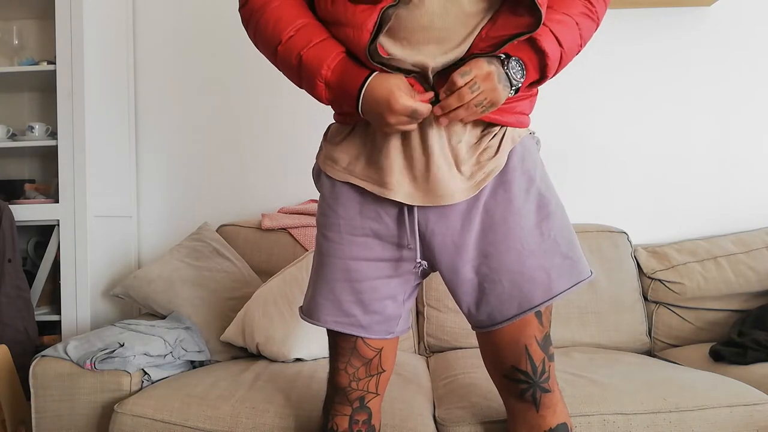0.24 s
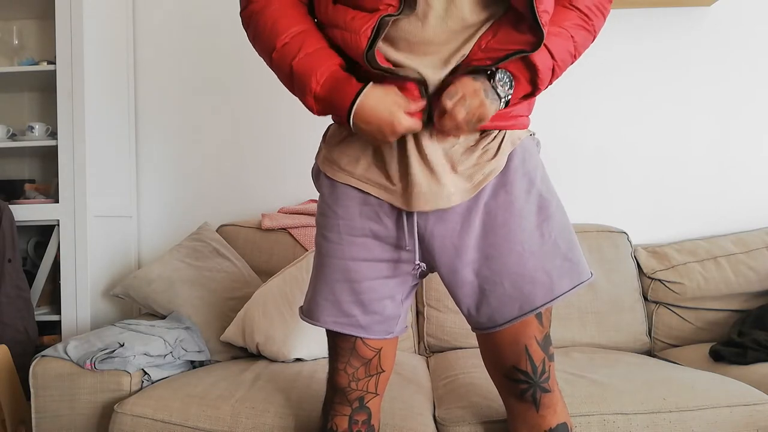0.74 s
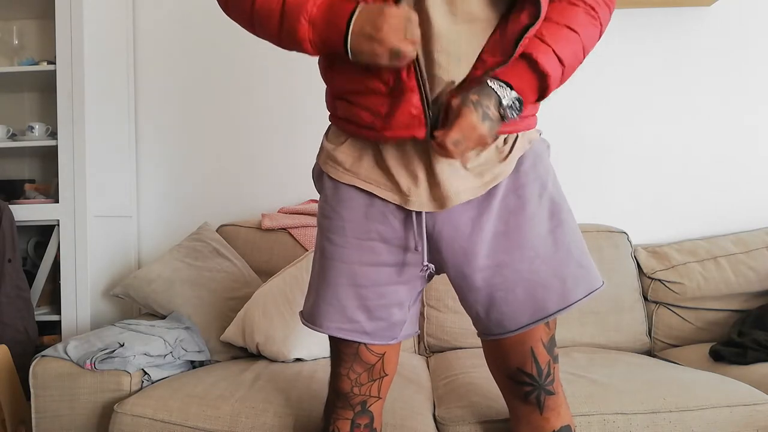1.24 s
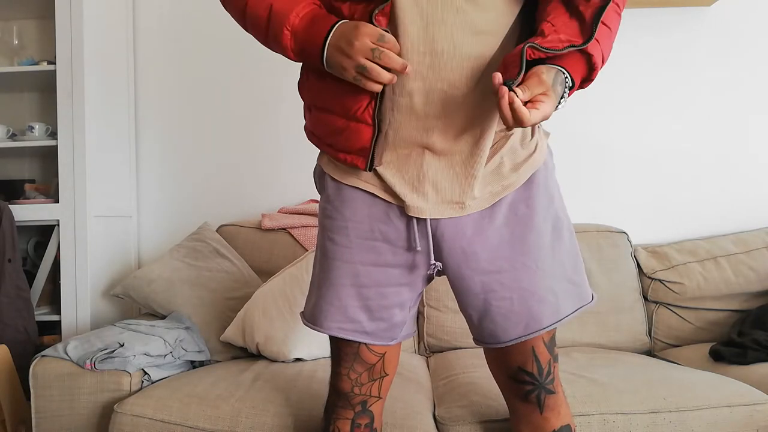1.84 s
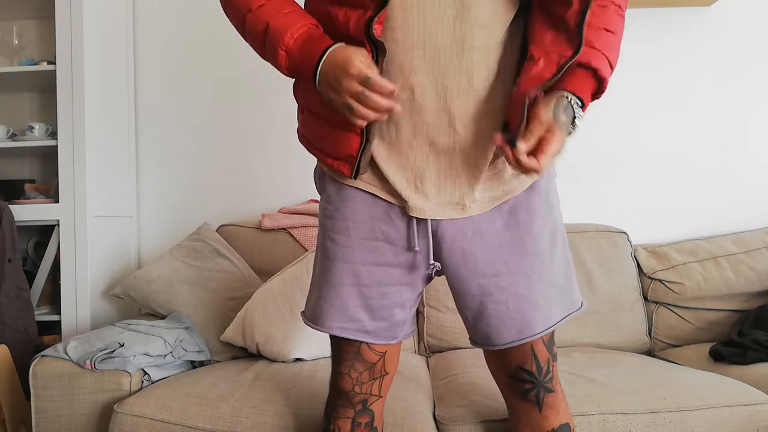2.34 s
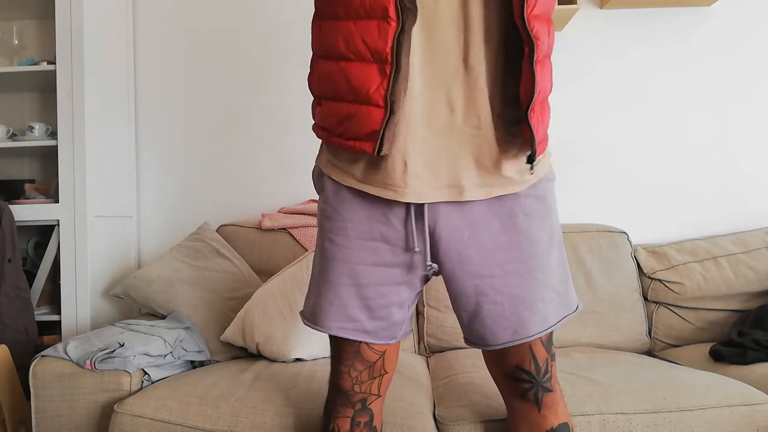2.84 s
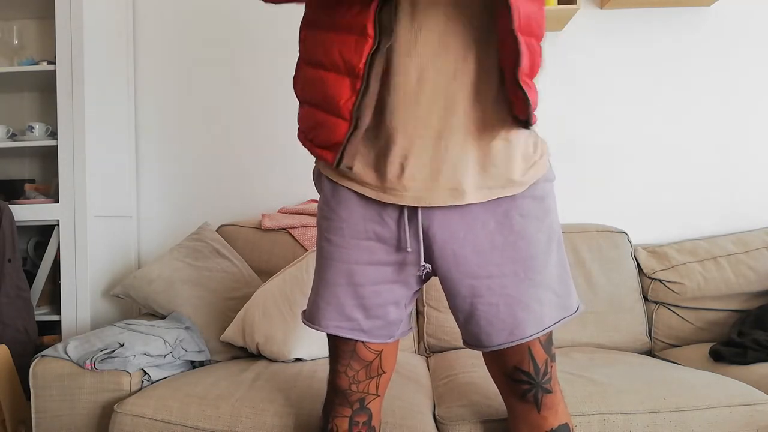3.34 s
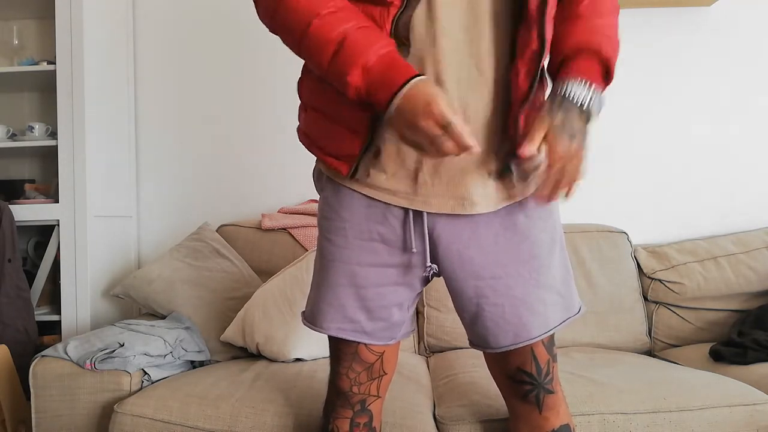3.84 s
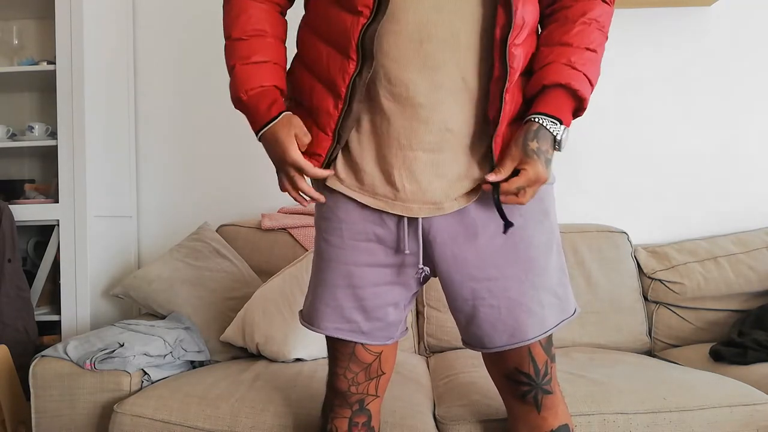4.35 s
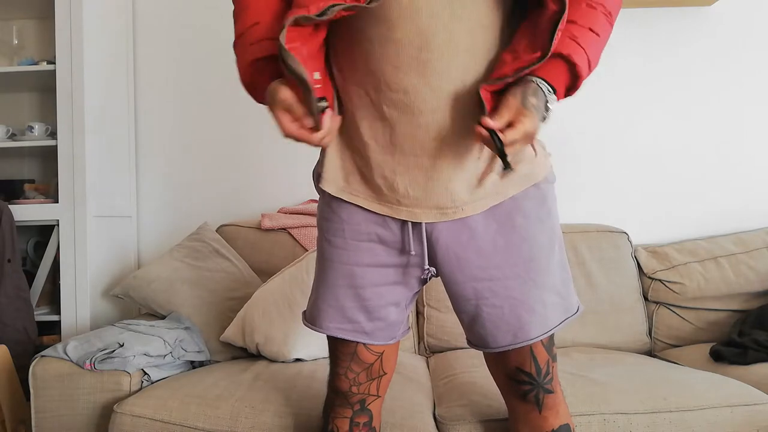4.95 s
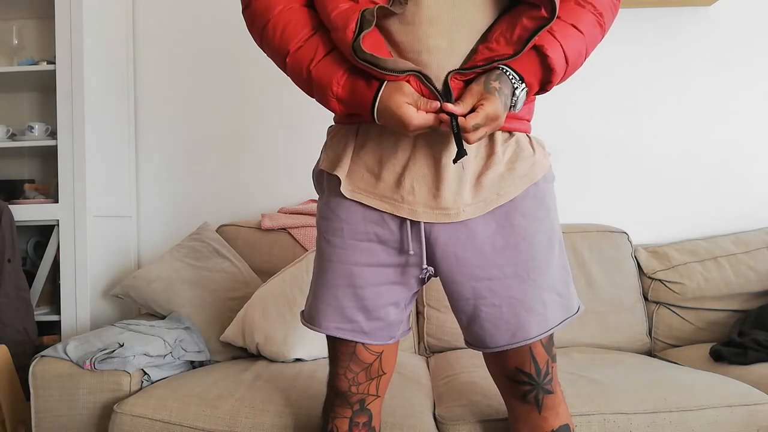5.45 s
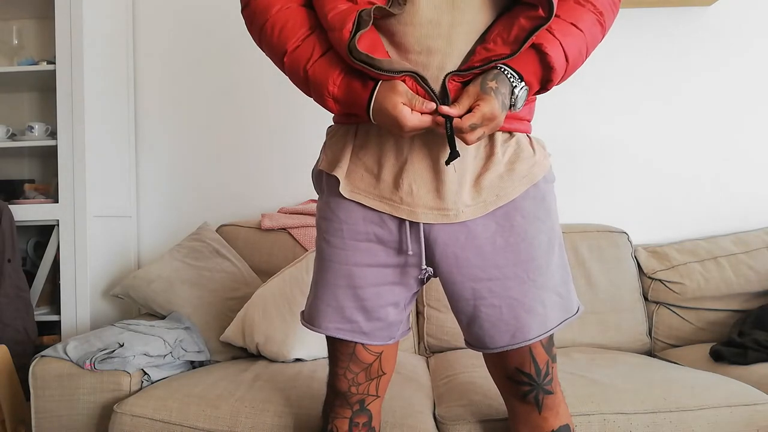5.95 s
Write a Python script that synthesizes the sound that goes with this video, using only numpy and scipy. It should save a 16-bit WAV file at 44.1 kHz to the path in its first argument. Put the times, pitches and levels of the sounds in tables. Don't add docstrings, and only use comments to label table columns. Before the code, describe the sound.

Close dry rustle of a padded jacket indoors, a short harsh rip and snap of zipper teeth, later a fast buzzing zip, then small ticks.

```python
import sys
import numpy as np
from scipy import signal
from scipy.fft import rfft, irfft, next_fast_len
from scipy.io import wavfile

SR = 44100
rng = np.random.default_rng(int(sys.argv[2]) if len(sys.argv) > 2 else 0)


def volts_from_decibels(level):
    exponent = np.asarray(level, float) / 20
    return 10 ** exponent


def wav_record(signal):
    frames = np.transpose(np.atleast_2d(signal))
    bounded = np.clip(frames, -1, 1)
    quanta = np.round(bounded * 32767).astype(np.int16)
    wavfile.write(sys.argv[1], SR, quanta)


N = 273403
CUTOFF_HZ = 15800

# (time [s], level [dB])
FIDGET_LEVEL = [(0, -63), (.7, -66), (.81, -61), (1.3, -58), (1.53, -64), (1.84, -70.5), (1.98, -78),
                (2.4, -73), (2.8, -60), (3.08, -59), (3.72, -66), (4.16, -66), (4.4, -70), (4.8, -68),
                (5.12, -59.5), (5.36, -61), (5.55, -75), (6.2, -80)]


def rms_one(x):
    return x / np.sqrt(np.mean(x ** 2) + 1e-20)


def in_time(rows):
    s, *columns = np.transpose(rows)
    return [np.interp(np.arange(N) / SR, s, c) for c in columns]


def at_hz(points, hz):
    point_hz, value = np.array(points).T
    return np.interp(np.log(hz), np.log(point_hz), value)


def drift(rate_hz):
    r = np.exp(-16 * np.pi * rate_hz / SR)
    noise = rng.standard_normal(N // 8 + 4002)
    slow = rms_one(signal.lfilter([1], [1, -2 * r, r * r], noise)[4000:])
    return np.interp(np.arange(N) / 8, np.arange(len(slow)), slow)


def butter(x, order, hz, kind):
    return signal.sosfilt(signal.butter(order, hz, kind, fs=SR, output="sos"), x)


def resonances(x, peaks):
    out = 0
    for k, (hz, width_hz, db) in enumerate(peaks):
        r = np.exp(-np.pi * width_hz / SR)
        b = (1 - r * r) / 2 * np.array([1, 0, -1])
        a = [1, -2 * r * np.cos(2 * np.pi * hz / SR), r * r]
        out = out + (-1) ** k * volts_from_decibels(db) * signal.lfilter(b, a, x)
    return out


def together(*levels_db):
    return np.sqrt(sum(volts_from_decibels(2 * db) for db in levels_db))


def swells(rows):
    curve = 1.35
    s, power = np.arange(0, N, 32) / SR, 1e-14
    for peak_s, db, rise_s, fall_s in rows:
        away = np.where(s < peak_s, (peak_s - s) / rise_s, (s - peak_s) / fall_s)
        power = power + volts_from_decibels(2 * (db - 10 * away ** curve))
    return np.interp(np.arange(N) / SR, s, 10 * np.log10(power))


def bands(spectrum, sources, patchy_db, low_hz, octaves):
    # (frequency [Hz], likeness [-1..1])
    likeness = [(60, 0.98), (150, 0.93), (300, 0.41), (560, -0.46), (1100, .6), (2000, 0.41), (4000, 0.2),
                (10000, .03)]
    edges = low_hz * 2 ** np.arange(0, np.log2(CUTOFF_HZ / low_hz) + octaves, octaves)
    for k, (low, high) in enumerate(zip(edges, edges[1:])):
        mid, side = butter(sources[k % 2], 2, [low, high], "band")
        hz = np.sqrt(low * high)
        alike = np.clip(at_hz(likeness, hz), -1, 1)
        gain = volts_from_decibels(at_hz(spectrum, hz) + patchy_db * drift(23.0))
        yield hz, gain * (np.sqrt(1 + alike) * mid + np.sqrt(1 - alike) * side * [[1], [-1]])


def room_tone():
    # (frequency [Hz], density [dB per Hz])
    background = [(8.8, -30), (15, 0), (31, -7), (55, -5), (119, -10), (145, -11), (184, -11.5),
                  (284, -20.5), (440, -21.5), (480, -23), (642, -18), (743, -21.5), (1680, -19),
                  (1830, -21.5), (6410, -25), (15800, -33.5)]
    noise = rng.standard_normal((2, 2, N))
    tone = sum(sound for hz, sound in bands(background, noise, 1.3, low_hz=15, octaves=1 / 2))
    return volts_from_decibels(-64.5) * rms_one(tone)


def folds(shell):
    # (peak time [s], filling level [dB], fall [s per 10 dB], shell vs filling [dB])
    creases = [(.01, -71, .12, 6), (.19, -67, .08, -2), (.34, -70, .08, 6), (.87, -64.5, .2, 9),
               (1.005, -65, .04, 15), (1.09, -67, .06, 6), (1.225, -60.5, .04, 7), (1.32, -80, .08, 23),
               (1.385, -52.5, .06, 9), (1.59, -68, .06, -2), (1.67, -68, .14, 3), (1.91, -71.5, .12, -5),
               (2.62, -74, .16, 16), (3.215, -55.5, .08, 8), (3.36, -63, .2, 8), (3.5, -54, .05, 2),
               (3.66, -72, .2, 3), (3.94, -72, .05, 4), (4.18, -64, .06, -1), (4.47, -76, .04, 10),
               (4.7, -72, .3, -2), (4.935, -73, .06, 15), (5.01, -62, .08, 0), (5.13, -65, .09, 0),
               (5.42, -59, .06, -8), (5.82, -74, .05, -6), (6.18, -71, .1, 1)]
    rise_s, snatched_rise_s = .035, .035 * .4
    rows = []
    for peak_s, db, fall_s, stiff_db in creases:
        rise = snatched_rise_s if db > -60 else rise_s
        rows.append((peak_s, db + shell * stiff_db, rise, fall_s))
    return swells(rows)


def rustle():
    # (frequency [Hz], density [dB per Hz])
    nylon = [(430, -9.5), (620, -13), (800, -9.5), (1000, -4.5), (1600, -7.5), (2300, -10), (4500, -10.5),
             (5800, -14), (7600, -6), (9700, -0.5), (11000, 2), (13000, -12.5), (15800, -16)]
    # (peak time [s], level [dB], rise [s per 10 dB], fall [s per 10 dB])
    panel_slides = [(.05, -62, .1, .07), (.32, -63, .08, .1), (.872, -47, .055, .15),
                    (1.008, -44.5, .08, .045), (1.115, -45.5, .05, .12), (1.157, -46.5, .08, .03),
                    (1.24, -51, .045, .15), (1.382, -43, .004, .11), (1.45, -47.5, .05, .04),
                    (1.664, -54, .1, .14), (2.58, -46, .09, .14), (3.495, -35.5, .08, .07),
                    (4.204, -56, .045, .09), (4.89, -48, .06, .12)]
    # (peak time [s], level [dB], rise [s per 10 dB], fall [s per 10 dB])
    sleeve_slides = [(.18, -66, .04, .06), (.575, -57, .13, .08), (2.25, -70, .25, .2),
                     (2.49, -50, .045, .1), (3.04, -65, .2, .15), (3.225, -40, .035, .12),
                     (3.32, -43, .08, .1), (3.405, -29.5, .05, .1), (3.68, -61, .06, .08),
                     (3.811, -59, .03, .08), (3.94, -56, .04, .12), (4.07, -56, .12, .08),
                     (4.468, -55.5, .05, .035), (4.58, -66, .08, .08), (4.705, -64, .15, .06),
                     (4.961, -47, .05, .06), (5.43, -63, .04, .08)]
    panel_db, sleeve_db = swells(panel_slides), swells(sleeve_slides)
    shell_db, (fidget_db,) = folds(shell=True), in_time(FIDGET_LEVEL)

    catches = volts_from_decibels(1.1 * drift(500.0) + 1.0 * drift(56.0))
    noise = catches * rng.standard_normal((2, 2, N))
    parts = np.zeros((3, 2, N))
    for hz, sound in bands(nylon, noise, 0.96, low_hz=424, octaves=1 / 4):
        parts[np.searchsorted([2400, 7000], hz)] += sound
    body, middle, hiss = map(rms_one, parts)

    panel_swing_db, sleeve_swing_db = panel_db + 45, sleeve_db + 45
    hiss_gain = together(panel_db, sleeve_db, fidget_db - 3)
    middle_gain = together(-52.5 + .75 * panel_swing_db, -57.5 + .75 * sleeve_swing_db,
                           fidget_db - 2, shell_db - 5)
    slide_body_db = -61 + .4 * np.maximum(panel_swing_db, sleeve_swing_db)
    body_gain = together(slide_body_db, fidget_db - 2.5, shell_db)
    cloth = hiss_gain * hiss + middle_gain * middle + body_gain * body
    pan_db = 1.1
    return cloth * volts_from_decibels(pan_db / 2 * np.array([[1], [-1]]))


def padding():
    mid, side = butter(rng.standard_normal((2, N)), 2, [170, 440], "band")
    gain = together(folds(shell=False), in_time(FIDGET_LEVEL)[0] - 14)
    lumps = volts_from_decibels(2.0 * drift(30.0))
    return gain * lumps * rms_one(mid + 1.2 * side * volts_from_decibels(-5) * np.array([[1], [-1]]))


def taps(teeth, uneven_db):
    passed = np.diff(np.floor(teeth), prepend=0) != 0
    return passed * volts_from_decibels(uneven_db * rng.standard_normal(N))


def rip():
    # (time [s], level [dB])
    tear = [
        (.9468, -60.5),
        (.9478, -28.5),
        (.957, -27),
        (.964, -21.5),
        (.986, -22.5),
        (.989, -27),
        (.997, -42),
    ]
    # (frequency [Hz], width [Hz], level [dB])
    tape_rings = [(3100, 930, -9), (3960, 300, 0.5), (4550, 350, 0), (5270, 350, -1), (6600, 1500, -11.5)]
    # (frequency [Hz], width [Hz], level [dB])
    slider_rings = [(8740, 790, -3), (9600, 370, 2.5), (10400, 550, -0.5), (11600, 700, -8),
                    (14200, 2500, -18)]
    level_db, = in_time(tear)
    s = np.arange(N) / SR
    low_db = -9.5 + 550 * np.clip(s - tear[3][0], 0, .022)

    teeth = np.cumsum(750 * volts_from_decibels(2.5 * drift(400.0))) / SR
    volley = taps(teeth, uneven_db=3.5) * rng.choice([-1, 1], N)
    clicks = volley + .1 * rng.standard_normal(N)
    low = butter(rms_one(resonances(clicks, tape_rings)), 2, 2800, "high")
    high = rms_one(resonances(clicks, slider_rings))
    during = (s > tear[0][0]) & (s < tear[-1][0])
    return during * volts_from_decibels(level_db) * (high + volts_from_decibels(low_db) * low)


def knocks():
    # (time [s], crack [dB], snap vs crack [dB], knock vs crack [dB], thud vs crack [dB])
    hits = [(0.9873, -21, -9, -14, -38), (1.2217, -36.5, -7, 1, -19), (1.3757, -23, -21, -27, -17),
            (1.3771, -22, -10, -4, -26.5), (2.3511, -64, -15, -16, -15), (3.1382, -47, -12, -9, -26),
            (3.1640, -44, -11, -9, -25), (3.176, -42.5, -12, -9, -22), (3.8, -39.5, -27, -29, -33),
            (3.9779, -37, -24, -19, -34), (4.577, -60, -14, -12, -21), (4.6998, -50, -16, -15, -26),
            (4.8363, -56, -12, -12, -21), (5.407, -49.5, -15, -14.5, -19.5),
            (5.4094, -47, -8.5, -6.5, -10.5), (5.4133, -48, -1, -12, -4), (5.4152, -45.5, -7.5, -6, -11),
            (6.1406, -62, -7, 2, -12), (6.1726, -58.5, -8.5, 3.5, -7), (3.5065, -27, -16, -22, -30)]
    # (frequency [Hz], t60 [s], level [dB])
    snap_modes = [(2900, 0.0057, -2), (3900, .004, 2.5), (4800, .003, -4.5), (5700, .003, 0.5)]
    # (frequency [Hz], t60 [s], level [dB])
    knock_modes = [(1050, 0.022, -4.5), (1400, 0.0065, -3), (1780, 0.006, -1.5)]
    # (frequency [Hz], t60 [s], level [dB])
    thud_modes = [(240, .045, -2), (330, .04, 0), (430, .035, -2)]
    s, crack_db, snap_db, knock_db, thud_db = np.transpose(hits)
    crack_hz = 9700 - 65 * knock_db
    at, out = np.round(s * SR).astype(int), np.zeros(N)

    crack_samples, decay_ms = 400, 0.98
    ms = np.arange(crack_samples) / SR * 1000
    bursts = rng.standard_normal((len(at), crack_samples)) * np.exp(-ms / decay_ms)
    for k, burst in enumerate(bursts):
        crack = resonances(burst, [(crack_hz[k], 2500, 0), (11500, 8000, -12)])
        out[at[k]:at[k] + crack_samples] += volts_from_decibels(crack_db[k] + 3.0) * crack / np.abs(crack).max()

    struck = ((snap_modes, crack_db + snap_db + 3.5),
              (knock_modes, crack_db + knock_db + 6.0),
              (thud_modes, crack_db + thud_db + 4))
    for modes, strength_db in struck:
        spread = rng.standard_normal((len(at), len(modes)))
        for k, (hz, t60_s, db) in enumerate(modes):
            clicks = np.full(N, 1e-18)
            clicks[at] = volts_from_decibels(strength_db + db + 1.2 * spread[:, k])
            r, w = volts_from_decibels(-60 / (t60_s * SR)), 2 * np.pi * hz / SR
            ring = signal.lfilter([0, np.sin(w)], [1, -2 * r * np.cos(w), r * r], clicks)
            out += (-1) ** k * ring
    return butter(out, 2, 190, "high")


def rubs():
    # (centre time [s], length [s], frequency [Hz], width [Hz], level [dB])
    songs = [
        (1.013, 0.067, 1025, 40, -58),
        (1.105, 0.068, 1003, 40, -58),
        (1.205, .025, 1750, 200, -61),
        (1.33, .07, 1550, 300, -61),
        (2.532, 0.03, 4970, 900, -56),
        (3.217, 0.037, 1470, 150, -56),
        (4.224, .1, 2830, 200, -66),
        (5.15, .1, 2900, 500, -68),
        (5.296, .12, 1320, 80, -73),
    ]
    out, s, grit = np.zeros(N), np.arange(N) / SR, rng.standard_normal(N)
    for centre_s, length_s, hz, width_hz, db in songs:
        peak = [(hz, width_hz, 0)]
        sung = rms_one(resonances(resonances(grit, peak), peak))
        out += volts_from_decibels(db) * np.exp(-(2 * (s - centre_s) / length_s) ** 4) * sung
    return out


def zipping():
    # (time [s], bite of the teeth [dB], scrape [dB])
    bearing = [
        (3.23, -64, -54),
        (3.27, -55.5, -50),
        (3.338, -52, -47),
        (3.35, -47, -34),
        (3.375, -43, -42),
        (3.43, -40, -31),
        (3.472, -33, -33),
        (3.497, -51, -29),
        (3.56, -68, -60),
    ]
    # (time [s], rate [teeth per s])
    speed = [(3.23, 440), (3.285, 432), (3.32, 550), (3.345, 636), (3.415, 590), (3.435, 545), (3.468, 518),
             (3.495, 509), (3.59, 520)]
    # (frequency [Hz], level of a multiple [dB])
    buzz_colour = [(850, -8), (1030, 5), (1200, -5), (1550, 1), (1780, 4), (2100, -4), (2550, -6),
                   (3300, -5.5), (4500, -6), (6500, -10)]
    # (frequency [Hz], level vs bite [dB])
    tape_hum = [(440, -0.5), (480, -4), (505, -21), (640, -24)]
    (per_s,), (buzz_db, scrape_db) = in_time(speed), in_time(bearing)
    hum_db = buzz_db + at_hz(tape_hum, per_s)
    teeth = np.cumsum(per_s * (1 + .006 * drift(60.0))) / SR

    buzz = 0
    for k in range(2, 13):
        phase = 2 * np.pi * k * teeth + .05 * k * drift(120.0)
        multiple_db = at_hz(buzz_colour, k * per_s) + min(k, 5) / 1.5 * drift(25)
        buzz = buzz + volts_from_decibels(multiple_db) * np.cos(phase)
    hum = np.sqrt(2) * np.sin(2 * np.pi * teeth) * volts_from_decibels(2.0 * drift(40.0))
    throb = (np.exp(-2.5 * (teeth % 1)) + .2) * volts_from_decibels(2.0 * drift(300.0))
    scrape = resonances(throb * rng.standard_normal(N),
                        [(10400, 2200, 3.5), (12500, 5400, -7), (4640, 5000, -10)])

    s = np.arange(N) / SR
    moving = np.clip((s - bearing[0][0]) / .02, 0, 1) * np.clip((bearing[-1][0] - s) / 0.02, 0, 1)
    return moving * (volts_from_decibels(buzz_db) * rms_one(buzz) + volts_from_decibels(hum_db) * hum + volts_from_decibels(scrape_db) * rms_one(scrape))


def puff():
    # (peak time [s], level [dB], rise [s per 10 dB], fall [s per 10 dB])
    flutters = [
        (3.95, -77, .05, .1),
        (4.188, -50.5, .02, .07),
        (4.264, -55, .05, .07),
    ]
    # (peak time [s], level [dB], rise [s per 10 dB], fall [s per 10 dB])
    pushes = [
        (3.912, -58, .025, .08),
        (4.062, -57, .06, .06),
        (4.264, -55, .1, .15),
        (4.4, -57, .12, .08),
    ]
    flutter = butter(rng.standard_normal(N), 4, [65, 260], "band")
    push = butter(rng.standard_normal(N), 2, [16, 45], "band")
    return volts_from_decibels(swells(flutters)) * rms_one(flutter) + volts_from_decibels(swells(pushes)) * rms_one(push)


def placed(x, pan_db, lag):
    size = next_fast_len(N)
    turn = np.exp(-2j * np.pi * np.arange(size // 2 + 1) / size * lag)
    left = irfft(rfft(x, size) * turn, size)[:N]
    return np.array([left * volts_from_decibels(pan_db / 2), x * volts_from_decibels(-pan_db / 2)])


def room(x):
    # (frequency [Hz], t60 [s])
    decay = [(200, 0.72), (1000, .4), (4500, .38), (10000, .3), (16000, .18)]
    size = next_fast_len(N + SR)
    hz = np.arange(size // 2 + 1) * SR / size + 1
    t60_s, out = at_hz(decay, hz), np.zeros((2, size // 2 + 1), complex)
    for k, lag_s in enumerate(rng.uniform(.004, .03, size=20)):
        loop = volts_from_decibels(-60 * lag_s / t60_s) * np.exp(-2j * np.pi * hz * lag_s)
        out[k % 2] += (-1) ** (k // 2) * loop / (1 - loop)
    return irfft(out * rfft(x, size), size)[:, :N]


def scene():
    torn, buzz, hits = rip(), zipping(), knocks() + rubs()
    near = placed(torn, pan_db=1.0, lag=.3) + placed(buzz, pan_db=0.0, lag=2.3)
    near = near + placed(hits, pan_db=0.7, lag=.3)
    wet = volts_from_decibels(-17.5) * room(torn + buzz + volts_from_decibels(-5) * hits)
    return near + wet + rustle() + padding() + puff() + room_tone()


def top_cut(x):
    return signal.sosfilt(signal.butter(12, 16650, fs=SR, output="sos"), x)


def record(dry):
    low_pass = signal.cheby2(12, 60, CUTOFF_HZ + 500, fs=SR, output="sos")
    mix = signal.sosfilt(low_pass, dry)
    return top_cut(mix)


dry = scene()
out = record(dry)
wav_record(out)
```